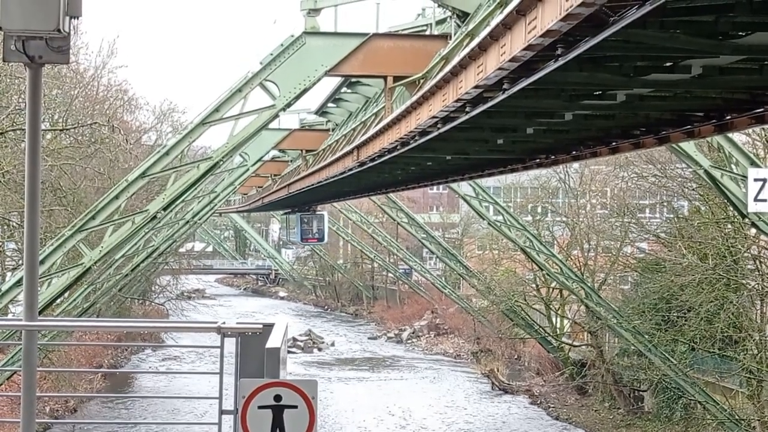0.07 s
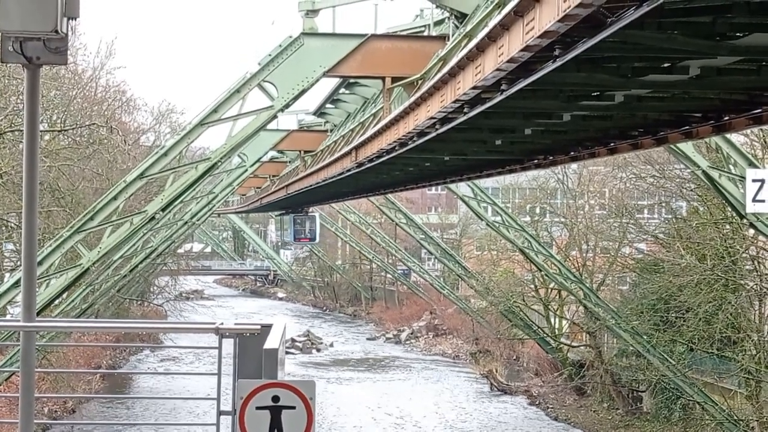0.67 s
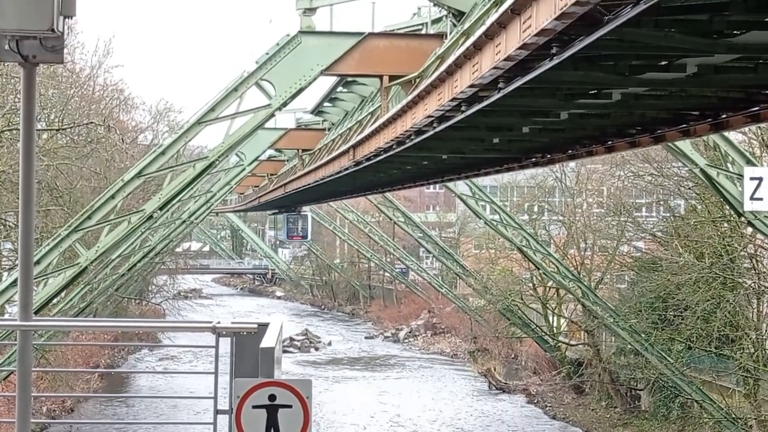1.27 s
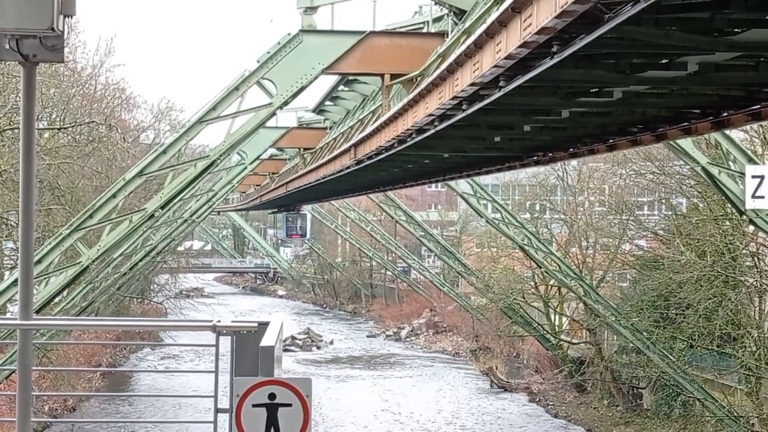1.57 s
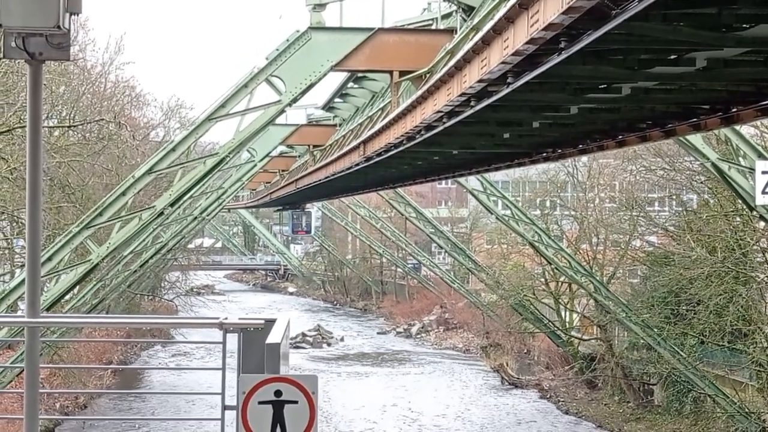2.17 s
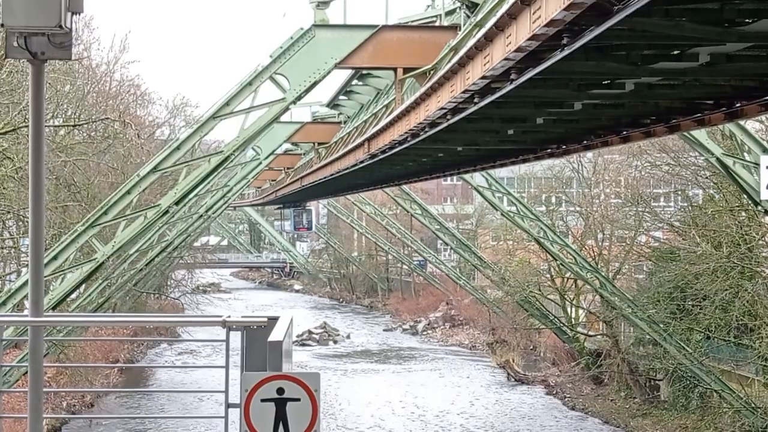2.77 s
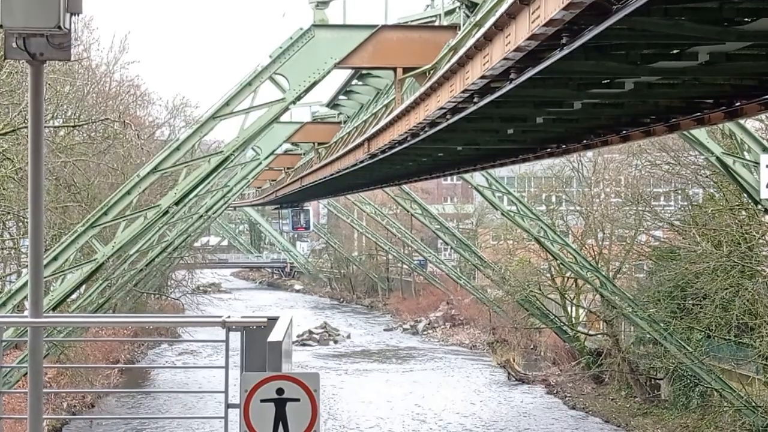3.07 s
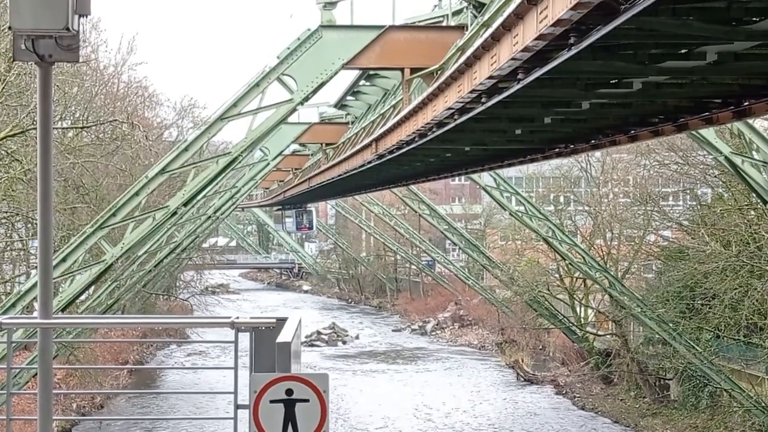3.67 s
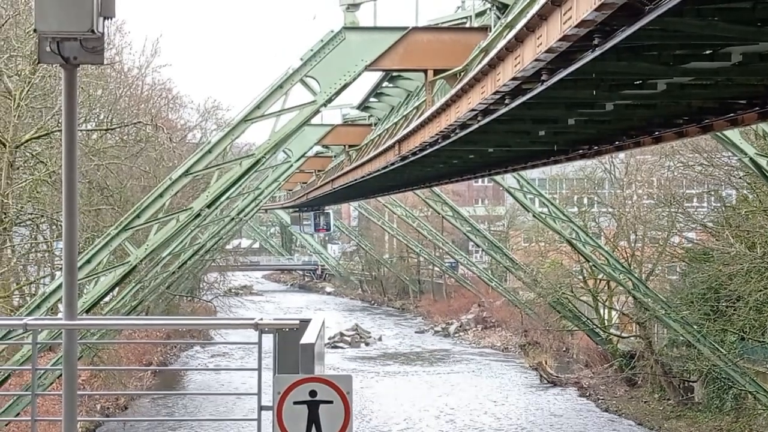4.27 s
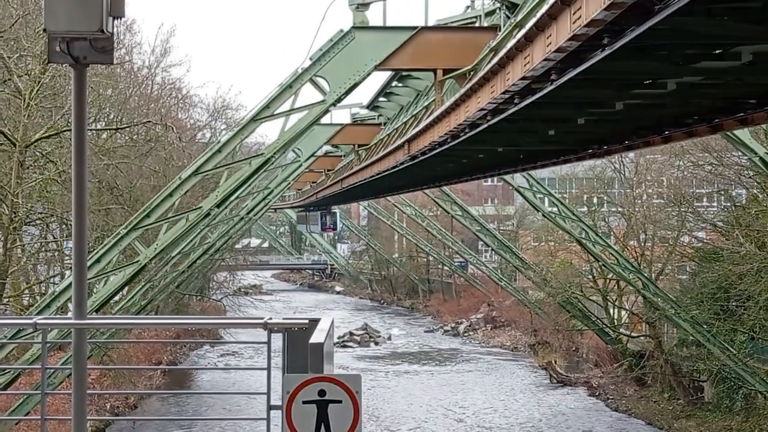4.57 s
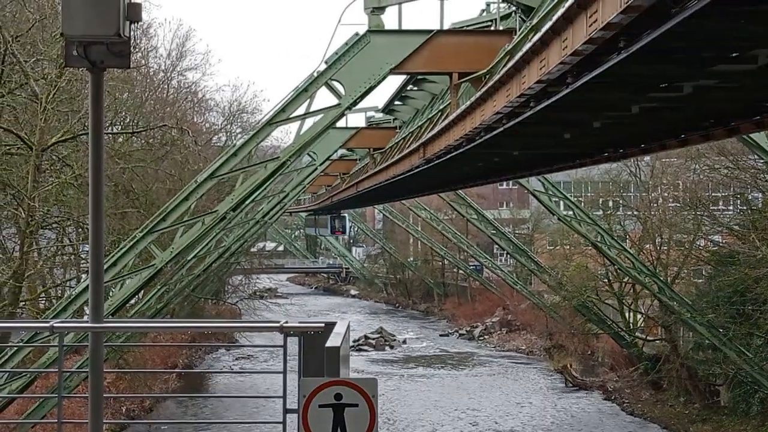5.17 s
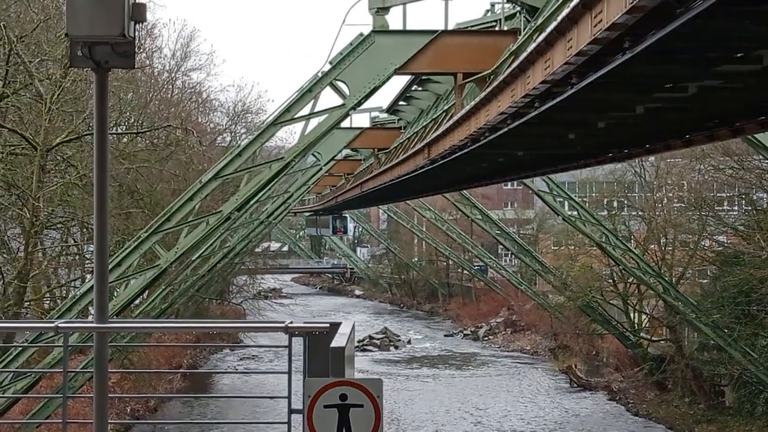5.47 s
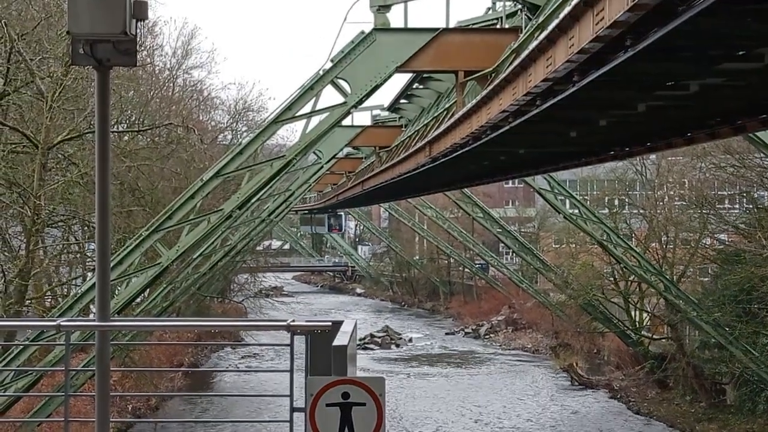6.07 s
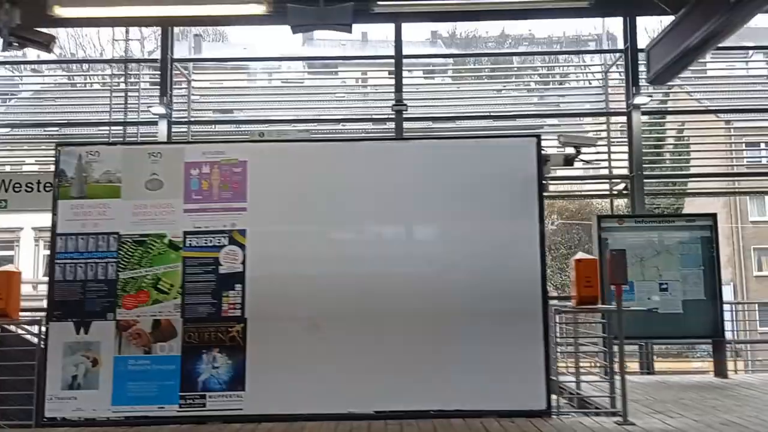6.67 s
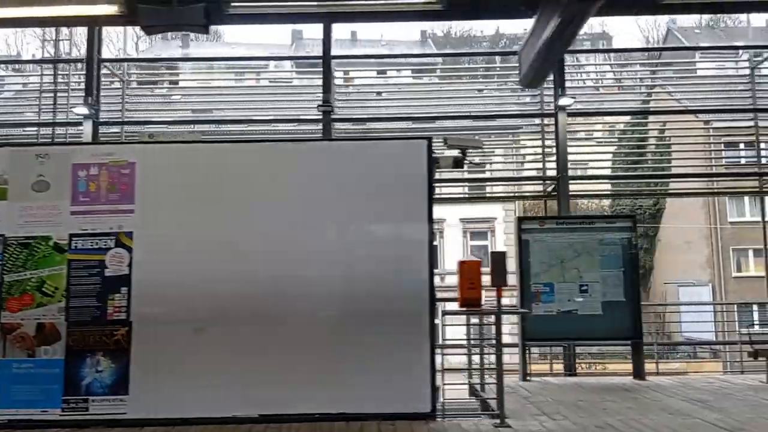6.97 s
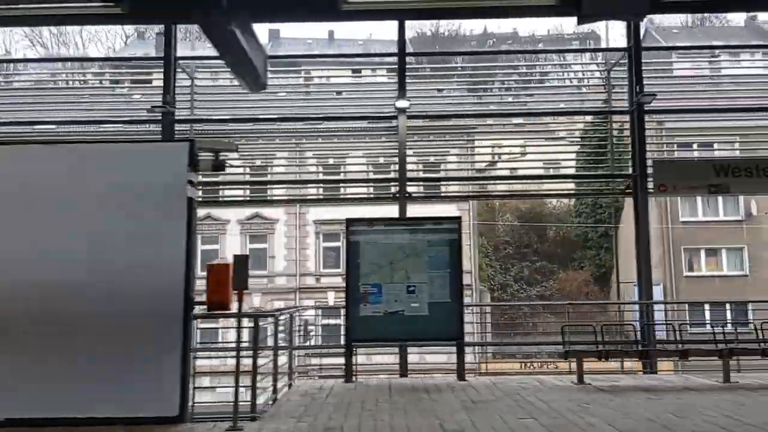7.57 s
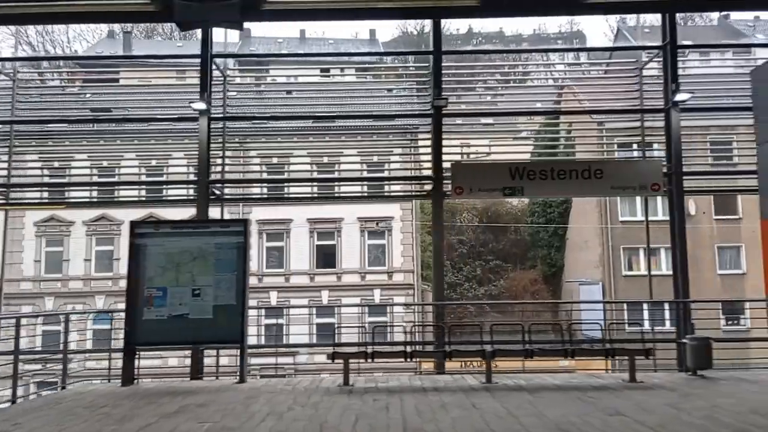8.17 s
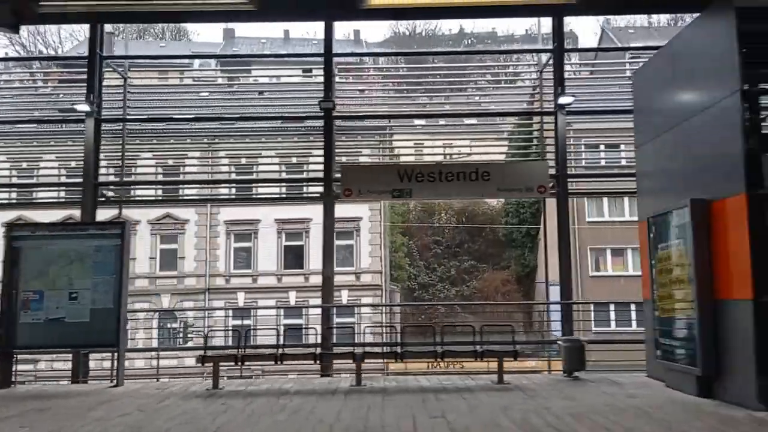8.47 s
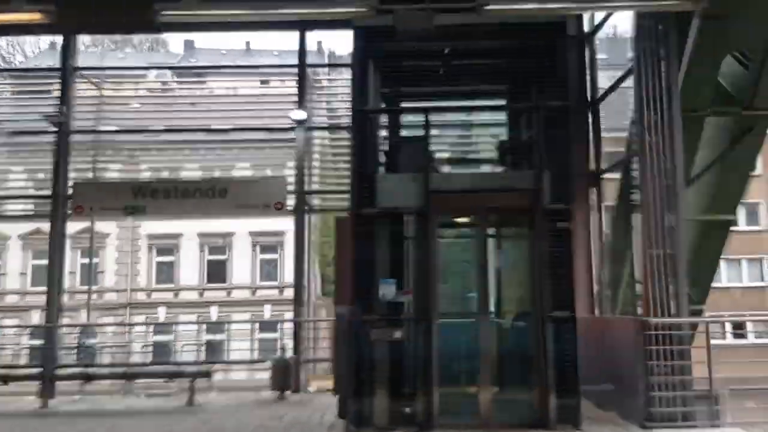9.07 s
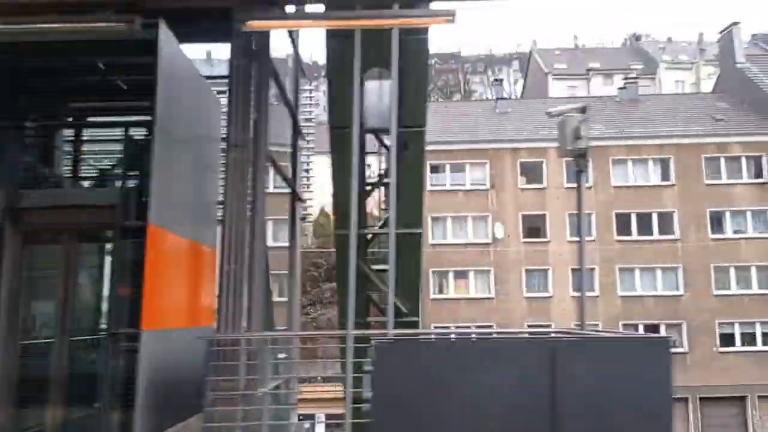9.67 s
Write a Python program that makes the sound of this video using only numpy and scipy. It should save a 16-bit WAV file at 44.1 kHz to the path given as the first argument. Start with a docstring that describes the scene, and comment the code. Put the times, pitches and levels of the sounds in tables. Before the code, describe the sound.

A river rushes under a rumbling suspension railway, then a moving carriage hums and thuds inside, with a faint wheel squeak.

```python
"""A shallow river rushes with countless bubbles under the steel track of a suspension railway, which
drones and booms as a train rumbles away. The sound stops with a soft thump. After a short silence the
inside of a carriage fades in as it leaves a station: the bogies shake the body, bumps in the track make
it boom, three fans beat against each other, a wheel squeaks faintly and something clacks."""
import sys
import numpy as np
from scipy import signal
from scipy.fft import rfft, irfft, next_fast_len
from scipy.io import wavfile
from scipy.ndimage import uniform_filter1d

SR = 44100
rng = np.random.default_rng(int(sys.argv[2]) if len(sys.argv) > 2 else 0)


def dump_mix(stems):
    """Bounce the given channels to the path in sys.argv[1] as a 16-bit WAV at rate SR."""
    frames = np.atleast_2d(stems).T  # one column per channel
    limited = np.clip(frames, -1, 1)  # hard clip at full scale
    pcm = np.round(limited * 32767).astype(np.int16)
    wavfile.write(sys.argv[1], SR, pcm)


N = 432621
T = np.arange(N) / SR
HZ = np.maximum(np.arange(N // 2 + 1) * SR / N, 1)


def undb(db):
    """Decibels to gain."""
    return 10 ** (np.asarray(db) / 20)


def unit(x):
    """Scale to rms 1."""
    return x / np.sqrt(np.mean(x ** 2))


def gain_curve(points):
    """Gain per sample from (s, dB) points."""
    times_s, db = np.transpose(points)
    return undb(np.interp(T, times_s, db))


def noise():
    """White noise."""
    return rng.standard_normal(N)


def shape(x, response):
    """Filter by a response over HZ; rms 1."""
    size = next_fast_len(N, True)
    bins_hz = np.arange(size // 2 + 1) * SR / size
    return unit(irfft(rfft(x, size) * np.interp(bins_hz, HZ, response), size)[:N])


def colour(x, points):
    """Filter by (Hz, dB) points, falling 27 dB an octave beyond the ends; rms 1."""
    hz, db = np.transpose(points)
    octaves_outside = np.maximum(np.log2(hz[0] / HZ), 0) + np.maximum(np.log2(HZ / hz[-1]), 0)
    return shape(x, undb(np.interp(np.log(HZ), np.log(hz), db) - 27 * octaves_outside))


def walk(rate_hz):
    """Smooth random curve with rate_hz knots a second; rms 1."""
    knots = rng.standard_normal(2048)
    curve = np.interp(T * rate_hz, np.arange(len(knots)), knots)
    return unit(uniform_filter1d(curve, max(int(SR / rate_hz / 2), 1)))


def burst(start_s, rise_s, decay_s):
    """Envelope: linear rise, exponential decay."""
    age_s = T - start_s
    return np.clip(age_s / rise_s, 0, 1) * np.exp(-np.maximum(age_s - rise_s, 0) / decay_s)


def swell(crest_s, half_s):
    """Bell-shaped envelope."""
    return np.exp(-((T - crest_s) / half_s) ** 2)


def drifting_phase(hz, drift):
    """Phase of a tone whose pitch wanders by the fraction `drift`."""
    return 2 * np.pi * (rng.random() + np.cumsum(hz * (1 + drift * walk(5))) / SR)


def bubbles(decay_cycles, spread_db, sizes=24, per_size=1500):
    """Air pockets of many sizes; each rings for a few cycles and rises in pitch."""
    out = np.zeros(N)
    for hz in np.geomspace(450, 11000, sizes):
        decay_s = decay_cycles / hz
        t = np.arange(int(5 * decay_s * SR)) / SR
        ring = np.exp(-t / decay_s) * np.sin(2 * np.pi * hz * t * (1 + 0.019 * t / decay_s))
        strengths = undb(spread_db * np.minimum(rng.exponential(size=per_size), 5))
        births = np.zeros(N)
        births[rng.integers(0, N, per_size)] = strengths
        out += np.sqrt(hz) * unit(signal.oaconvolve(births, ring)[:N])
    return unit(out)


# Spectra of the rush, spray over stones and splashes. Each row: frequency in Hz, relative level in dB.
RUSH_SPECTRUM = [(310, -3), (380, .5), (550, -2.5), (650, -0.2), (900, -1.05), (1300, -4.5), (2050, -4),
                 (2350, -1.5), (2650, -4), (2880, -3.5), (3300, -6.5), (4270, -12), (5000, -23.5)]
SPRAY_SPECTRUM = [(2800, -26.5), (4000, -2), (5000, 0.5), (6200, -1.5), (7000, -7.5), (8000, -15.5),
                  (9000, -20), (10000, -28), (12000, -47), (15500, -44.5)]
SPLASH_SPECTRUM = [(7000, 5.5), (9000, -0.5), (11000, -9.5), (13000, -28)]
# River surges. Each row: crest in seconds, half length in seconds, spray lift in dB.
RIVER_SURGES = [(1.53, 0.45, 3.6), (3.9, 0.82, 3.5)]


def river(rush_db=-39, rush_db_per_s=-0.1655, rush_surge_share=0.11, spray_db=-52.5):
    """Bubbles merge into a slowly easing rush; each surge lifts the spray and brightens it."""
    surge_db = sum(db * swell(crest_s, half_s) for crest_s, half_s, db in RIVER_SURGES)
    rush_gain = undb(rush_db + rush_db_per_s * T + rush_surge_share * surge_db)
    spray_gain = undb(spray_db + surge_db)
    water = noise() + undb(-5) * bubbles(decay_cycles=2.7, spread_db=-0.5)
    fizz = noise() + undb(-9.5) * bubbles(decay_cycles=2.5, spread_db=2.0)
    splashes = undb(-22) * (spray_gain / spray_gain.max()) ** 2 * colour(noise(), SPLASH_SPECTRUM)
    rush = rush_gain * undb(0.1 * walk(14)) * colour(water, RUSH_SPECTRUM)
    spray = spray_gain * undb(0.63 * walk(18)) * (colour(fizz, SPRAY_SPECTRUM) + splashes)
    return rush + spray


# Spectra of the track boom and wheel drone. Each row: frequency in Hz, relative level in dB.
BOOM_SPECTRUM = [(25, -45), (40, -18.5), (60, -8.5), (95, -0.5), (130, -1), (170, -7.5), (260, -35)]
DRONE_SPECTRUM = [(110, -26), (170, -3.5), (220, -1.5), (290, -2), (350, -7), (430, -15.5), (700, -37.5)]
# Booms at track joints. Each row: start in seconds, level in dB.
JOINT_BOOMS = [(0.05, -48), (3.32, -43), (4.02, -37.5), (4.58, -42), (5.78, -40.5)]
# Wheel drone. Each row: time in seconds, level in dB.
DRONE_CURVE = [(0, -46), (1.8, -44), (4.5, -42), (5.15, -40), (5.55, -42.5), (6.38, -41)]


def departing_train(boom_floor_db=-52, boom_waver_db=0.6, drone_waver_db=0.77):
    """The steel track drones under the rolling wheels and booms as they cross its joints."""
    joints = sum(undb(db) * burst(start_s, rise_s=0.083, decay_s=0.17) for start_s, db in JOINT_BOOMS)
    boom_gain = np.hypot(joints, undb(boom_floor_db + boom_waver_db * walk(4.13)))
    wheel_gain = gain_curve(DRONE_CURVE) * undb(drone_waver_db * walk(6))
    drone_gain = np.hypot(wheel_gain, undb(-7) * joints)
    return boom_gain * colour(noise(), BOOM_SPECTRUM) + drone_gain * colour(noise(), DRONE_SPECTRUM)


# Whistle. Each row: time in seconds, rms level in dB.
WHISTLE_CURVE = [(0, -62), (1.2, -57), (2.75, -53), (3.05, -61), (3.5, -57), (6.4, -65)]


def whistle(hz=2758.6):
    """A faint thin tone above the water."""
    return gain_curve(WHISTLE_CURVE) * np.sqrt(2) * np.sin(drifting_phase(hz, drift=0.00016))


def tick(start_s=4.7218, db=-49):
    """One tiny bright tick."""
    treble = colour(noise(), [(9000, 1), (13000, -4), (15000, 2)])
    return undb(db) * burst(start_s, rise_s=0.00028, decay_s=0.0004) * treble


def thump(start_s=6.4085, hz=135, peak_db=-22):
    """One low swing of pressure."""
    cycle = np.clip((T - start_s) * hz, 0, 1)
    return -undb(peak_db) * np.sin(2 * np.pi * cycle)


# Carriage body resonances. Each row: frequency in Hz, width in Hz, relative level in dB.
BODY_MODES = [(63.7, 22, -10), (84.8, 8.3, 2), (111.5, 26.8, -1.5), (166, 16, -9.5), (184, 22, -11.5)]
# Bogie shake as the carriage gathers way. Each row: time in seconds, level in dB.
BOGIE_CURVE = [(6.86, -36), (7.22, -40), (7.3, -34), (8.7, -32), (9.81, -31.5)]
# Spectra of rolling roar, cabin air and gear hiss. Each row: frequency in Hz, relative level in dB.
ROAR_SPECTRUM = [(12, -16), (25, -21.5), (45, -20), (130, -1), (180, -6.5), (250, 2.5), (300, -1),
                 (335, -1.5), (380, -11), (440, -10.5), (700, -25.5)]
AIR_SPECTRUM = [(400, -6.5), (600, -5.5), (850, -6), (1200, -9.5), (1800, -13), (2200, -10.5), (2600, -15),
                (2950, -15), (3300, -19.5), (3700, -16.5), (4000, -20.5), (4400, -21.5), (4900, -26),
                (7000, -40.5)]
GEAR_SPECTRUM = [(4900, -3), (5600, 11), (6650, 9), (7000, 2.5), (7500, 3), (8000, -5), (8700, -6),
                 (10000, -17), (12000, -29), (13500, -34), (15400, -18)]


def rolling(roar_db=-33, air_db=-40.2, gear_db=-58, shake_decay_s=0.17, evenness=0.82):
    """Bogies shake the body; rumble, roar and air noise rise at each jolt over the gear's hiss."""
    shake = np.sqrt(sum((undb(db) * burst(start_s, rise_s, shake_decay_s)) ** 2
                        for start_s, _, db, _, rise_s in TRACK_JOLTS))
    rumble_gain = np.hypot(gain_curve(BOGIE_CURVE), undb(-14.5) * shake)
    roar_gain = np.hypot(undb(roar_db + 0.9 * walk(9)), undb(-16.5) * shake)
    air_gain = np.hypot(undb(air_db), undb(-30) * shake)
    mode_power = sum(undb(2 * db) / (1 + ((HZ - hz ** 2 / HZ) / width_hz) ** 2) ** 2
                     for hz, width_hz, db in BODY_MODES)
    body = shape(noise(), np.sqrt(mode_power))
    # steady rolling keeps the ringing fairly even
    body = unit(body / uniform_filter1d(body ** 2, SR // 12) ** (evenness / 2))
    roar = roar_gain * colour(noise(), ROAR_SPECTRUM)
    air = air_gain * colour(noise(), AIR_SPECTRUM)
    hiss = undb(gear_db) * colour(noise(), GEAR_SPECTRUM)
    return rumble_gain * body + roar + air + hiss


FAN_BLADE_HZ, FAN_HARMONICS = (345.9, 355.8, 365.3), (1, 2, 3, 6, 7)
# Ventilation fans. Each row: one fan's rms levels in dB at FAN_HARMONICS.
FAN_LEVELS_DB = [(-36.5, -54.5, -55.5, -60, -66), (-37, -65.5, -72, -73, -67), (-35, -58, -62.5, -71, -68)]


def fans(flutter_db=1.5):
    """Three fans at nearly the same speed beat against each other."""
    out = np.zeros(N)
    for hz, levels_db in zip(FAN_BLADE_HZ, FAN_LEVELS_DB):
        phase = drifting_phase(hz, drift=0.00106)
        for harmonic, db in zip(FAN_HARMONICS, levels_db):
            out += undb(db + flutter_db * walk(11)) * np.sin(harmonic * phase)
    return np.sqrt(2) * out


# Cabin hum. Each row: frequency in Hz, rms level in dB.
CABIN_TONES = [(160.5, -44), (276.6, -39.5), (292.3, -45.5), (304.5, -44), (2213.4, -62), (2491.5, -64),
               (2557.5, -66), (3113, -68)]


def cabin_hum(flutter_db=2):
    """Steady cabin hum: low wavering tones and the thin high whine of the fans."""
    return np.sqrt(2) * sum(undb(db + flutter_db * walk(7.1)) * np.sin(drifting_phase(hz, drift=0.003))
                            for hz, db in CABIN_TONES)


# Jolts. Each row: start in seconds, lower mode in Hz, its level in dB,
# upper mode relative to it in dB, rise in seconds.
TRACK_JOLTS = [(7.35, 97.6, -21.5, -5.5, 0.038), (7.6, 85.2, -17.5, -4, 0.059), (8.098, 98, -23, -16, .015),
               (8.83, 110.6, -11.5, -10.5, 0.024), (8.91, 103, -13.5, -10, .075),
               (9.045, 114.3, -11.5, -15, 0.034), (9.135, 111.7, -22.5, -0.5, .017),
               (9.235, 103, -18, -5, 0.015), (9.68, 105.3, -22, -23, .045)]


def jolts(upper_hz=162, decay_s=0.047, roughness=0.1):
    """Bumps in the track set the carriage body booming for a few cycles in two modes."""
    out = np.zeros(N)
    for start_s, hz, db, upper_db, rise_s in TRACK_JOLTS:
        lower = np.sin(drifting_phase(hz, drift=0.01556))
        upper = undb(upper_db) * np.sin(drifting_phase(upper_hz, drift=0.0152))
        out += undb(db) * burst(start_s, rise_s, decay_s) * (1 + roughness * walk(50)) * (lower + upper)
    return out


# Flange contacts. Each row: crest in seconds, half length in seconds, level in dB.
FLANGE_BRUSHES = [(7.52, .22, -63), (9.24, 0.14, -58.5)]
# Flange hiss. Each row: frequency in Hz, relative level in dB.
FLANGE_SPECTRUM = [(4900, -5), (6200, 1.5), (7500, -6), (9000, -12), (11000, -20), (13500, -35),
                   (15300, -24)]


def flanges():
    """A bright hiss swells while a wheel flange brushes the rail."""
    contact = sum(undb(db) * swell(crest_s, half_s) for crest_s, half_s, db in FLANGE_BRUSHES)
    return contact * colour(noise(), FLANGE_SPECTRUM)


# Squeaks. Each row: start in seconds, pitch in Hz, width in Hz, level in dB, rise and decay in seconds.
WHEEL_SQUEAKS = [(7.761, 9100, 220, -66, .004, .02), (9.06, 6550, 200, -54, .04, .025),
                 (9.137, 6390, 110, -40.5, .008, .011), (9.135, 9520, 120, -60, .012, .03),
                 (9.12, 6280, 100, -51.5, .035, .045), (9.05, 1680, 50, -50, .25, .35),
                 (8.9, 858, 22, -47, .22, .3)]


def squeaks():
    """A wheel squeaks roughly on the rail; stick and slip hold its ringing at a steady size."""
    out = np.zeros(N)
    for start_s, hz, width_hz, db, rise_s, decay_s in WHEEL_SQUEAKS:
        ring = shape(noise(), 1 / (1 + ((HZ - hz) / width_hz) ** 2))
        ring /= np.sqrt(uniform_filter1d(ring ** 2, SR // 100) + 1e-9)
        out += undb(db) * burst(start_s, rise_s, decay_s) * ring
    return out


# Clack. Each row: start in seconds, level in dB, decay in seconds.
CLACK_HITS = [(8.899, -36, 0.026)]
# Clack timbre. Each row: frequency in Hz, relative level in dB.
CLACK_SPECTRUM = [(800, -14), (2500, 2), (4000, -2), (5200, -3), (6500, 0.5), (8000, -6.5), (10000, -15.5),
                  (13000, -29), (15500, -19)]


def clack(rise_s=0.0015):
    """A metallic clack that dies away quickly."""
    envelope = sum(undb(db) * burst(start_s, rise_s, decay_s) for start_s, db, decay_s in CLACK_HITS)
    return envelope * colour(noise(), CLACK_SPECTRUM)


def scene(river_end_s=6.416, cabin_start_s=6.85, cabin_full_s=7.186):
    """The river bank, a gap of silence, then the cabin."""
    cut_off = np.clip((river_end_s - T) / 0.0026, 0, 1)
    fade_in = np.clip((T - cabin_start_s) / (cabin_full_s - cabin_start_s), 0, 1)
    bank = cut_off * (river() + departing_train() + whistle() + tick()) + thump()
    cabin = fade_in * (rolling() + jolts() + flanges() + clack() + squeaks() + fans() + cabin_hum())
    return (bank + cabin)[None]


def record(dry):
    """Steep low-pass at 15.8 kHz."""
    return signal.sosfilt(signal.ellip(8, 0.2, 70, 15800, fs=SR, output="sos"), dry)


dry = scene()
out = record(dry)
dump_mix(out)
```